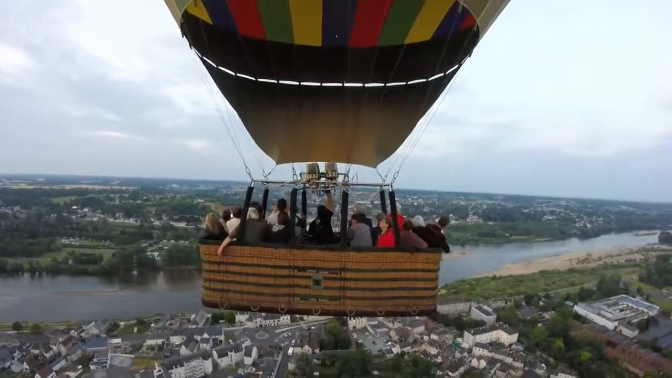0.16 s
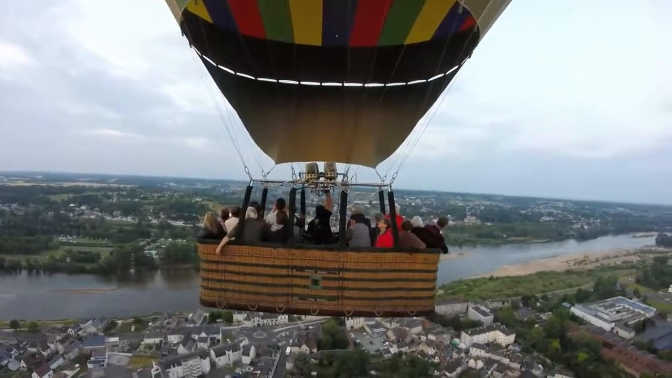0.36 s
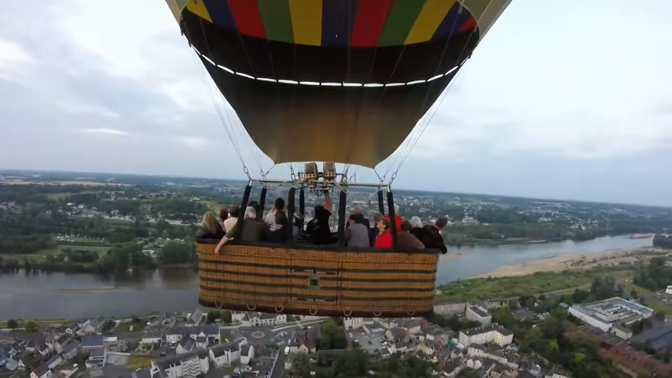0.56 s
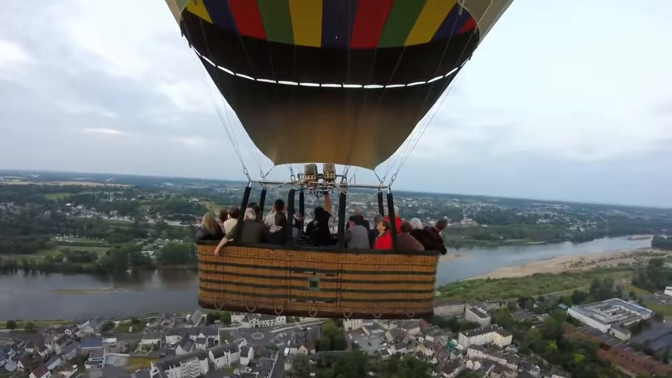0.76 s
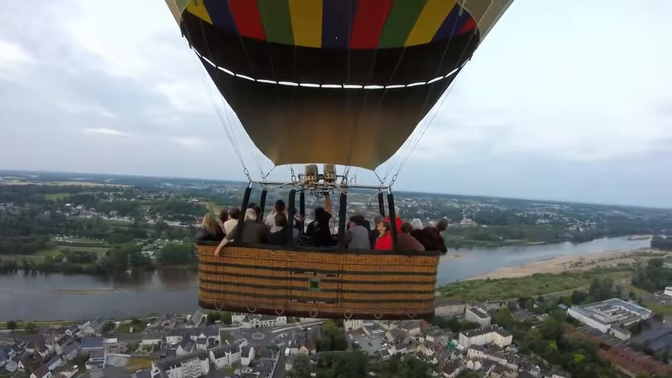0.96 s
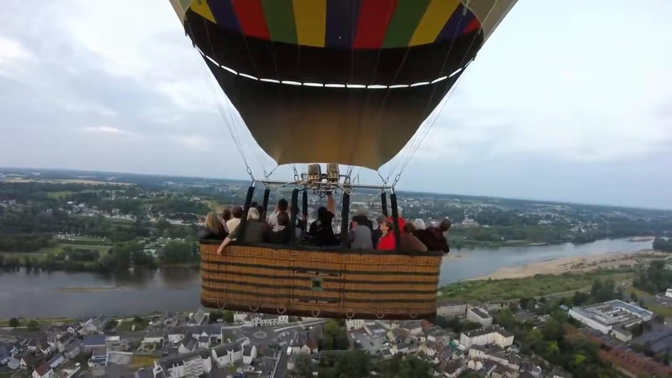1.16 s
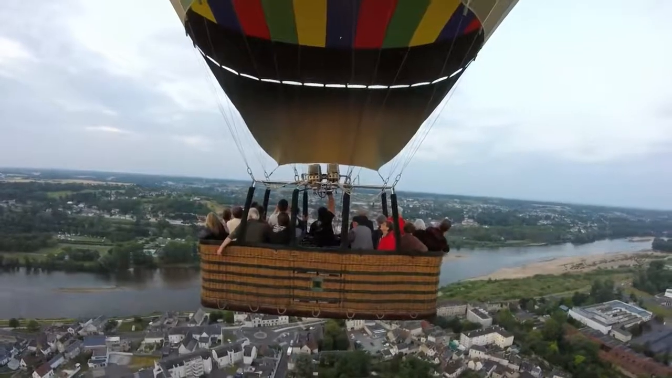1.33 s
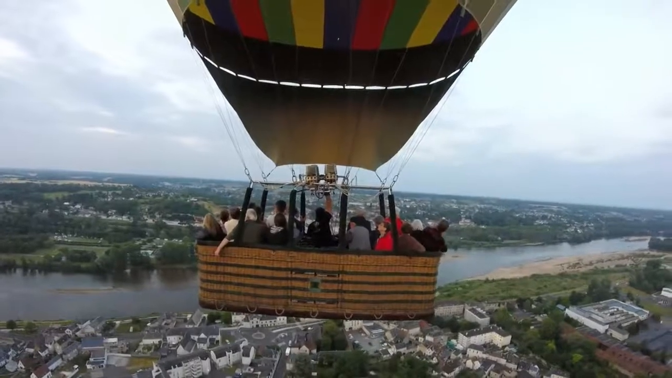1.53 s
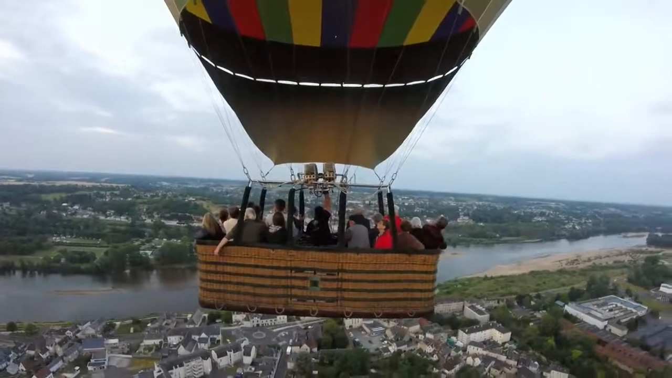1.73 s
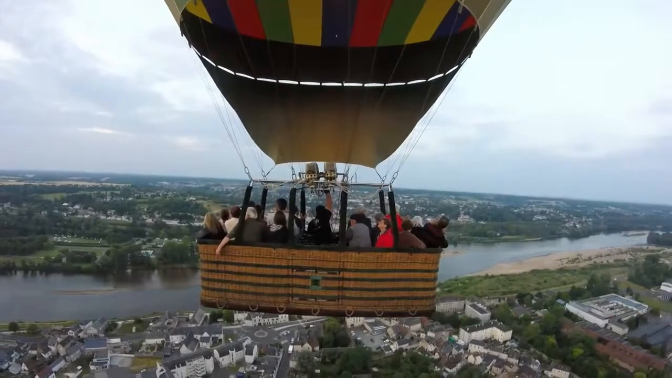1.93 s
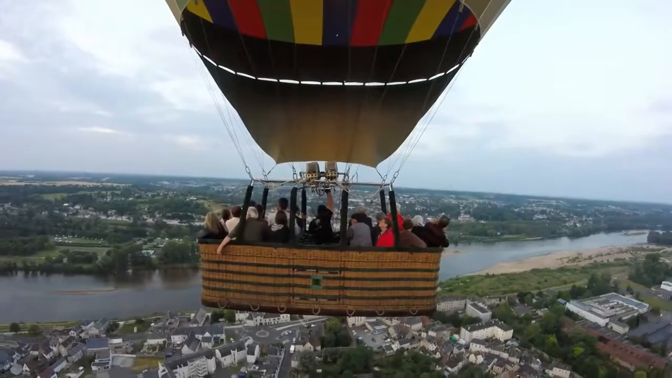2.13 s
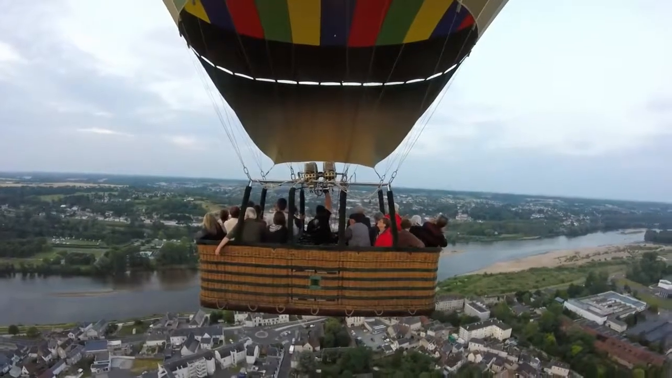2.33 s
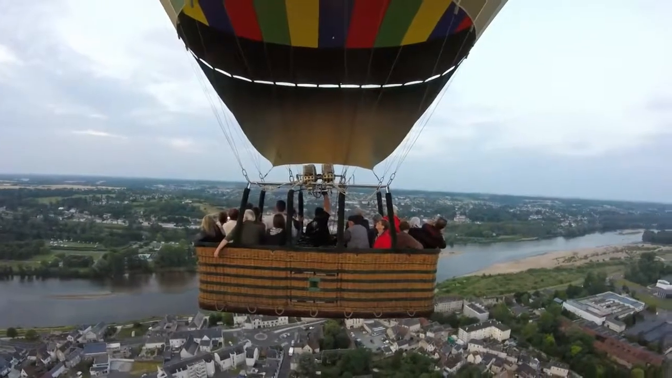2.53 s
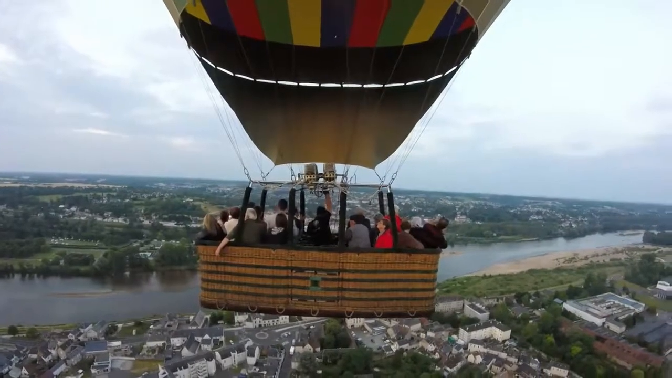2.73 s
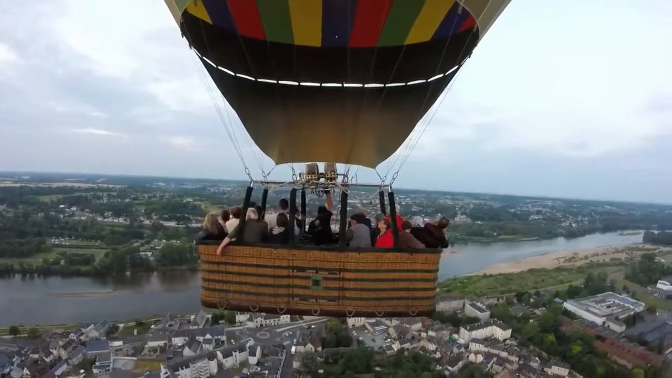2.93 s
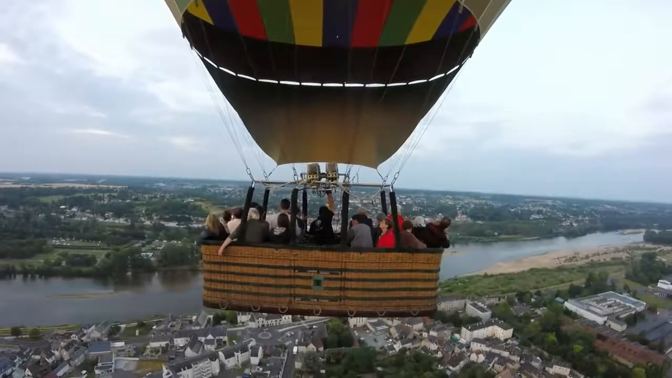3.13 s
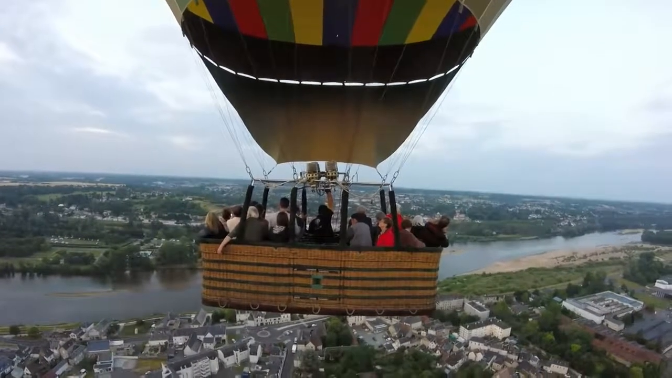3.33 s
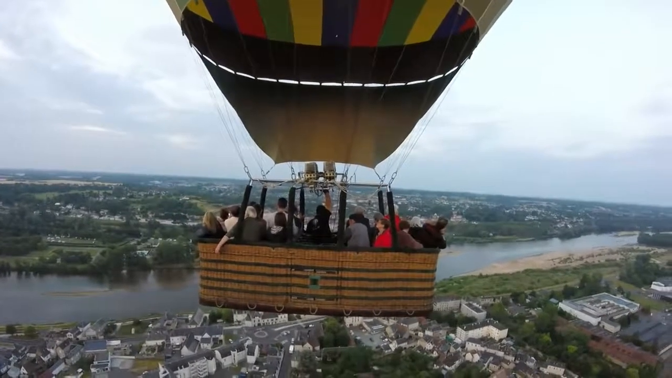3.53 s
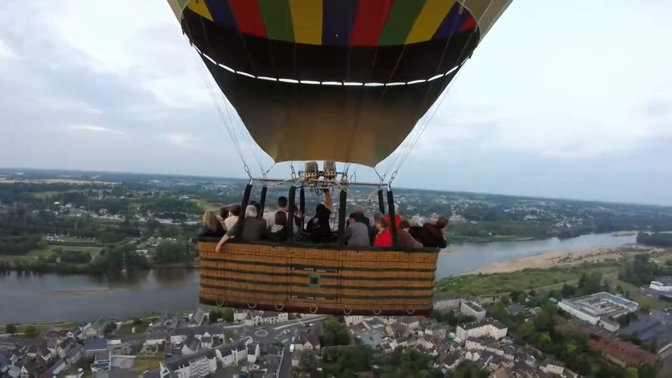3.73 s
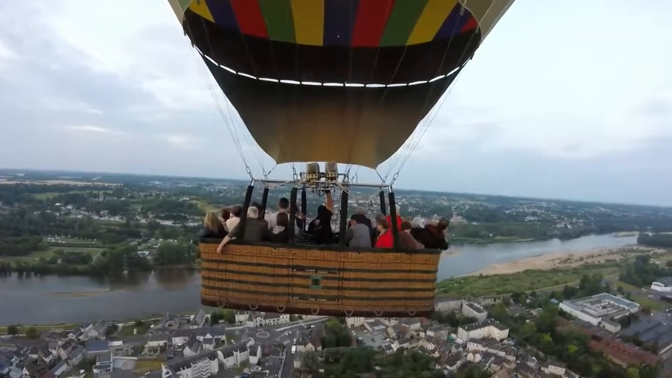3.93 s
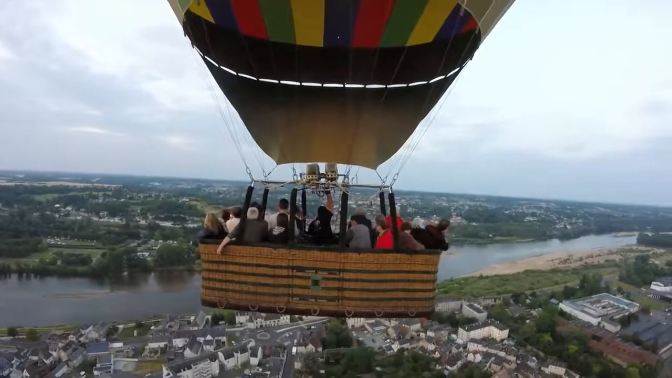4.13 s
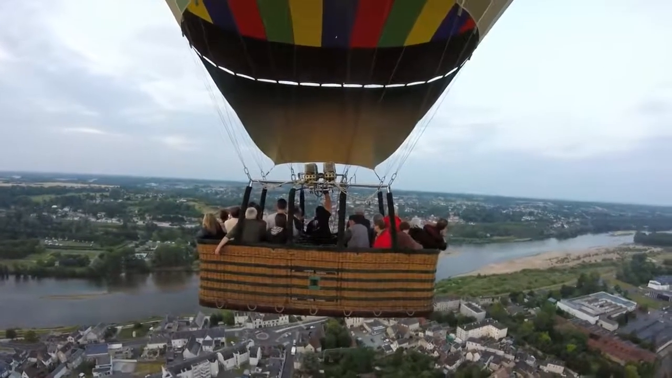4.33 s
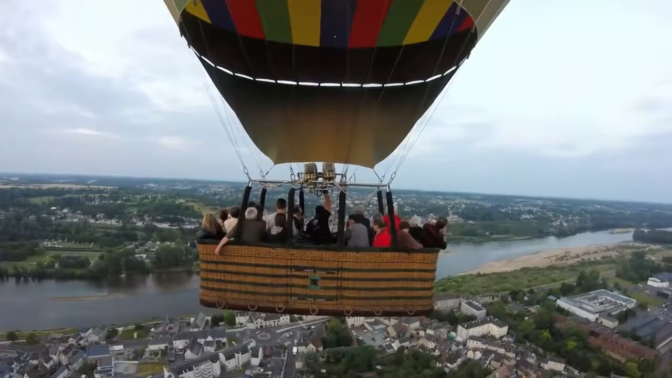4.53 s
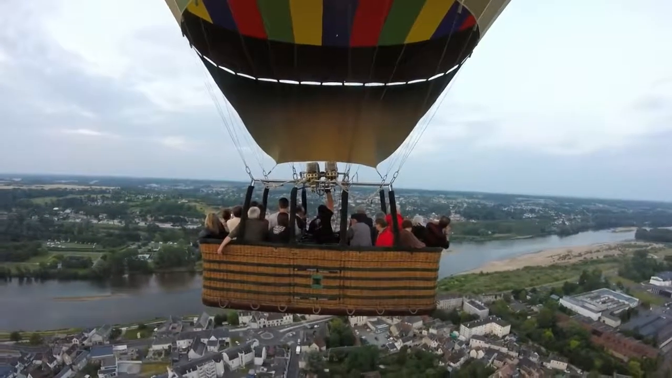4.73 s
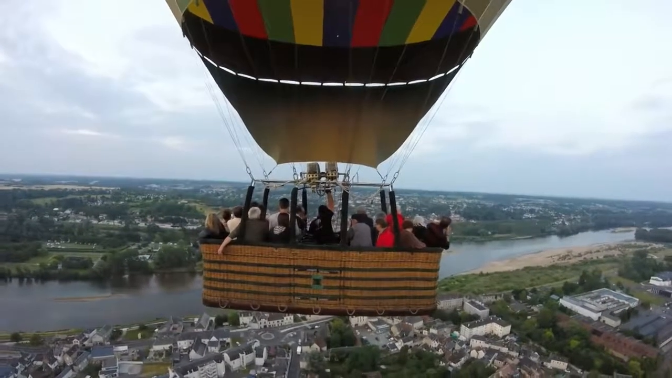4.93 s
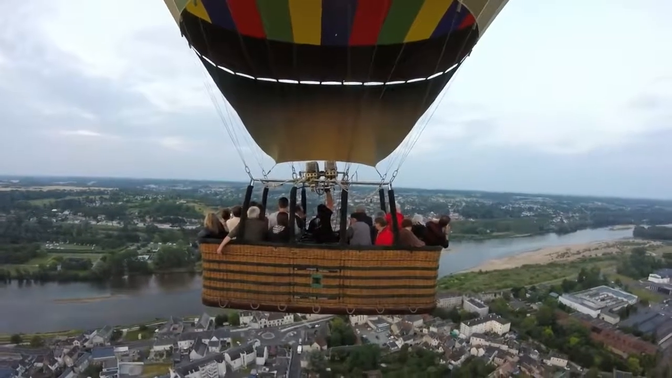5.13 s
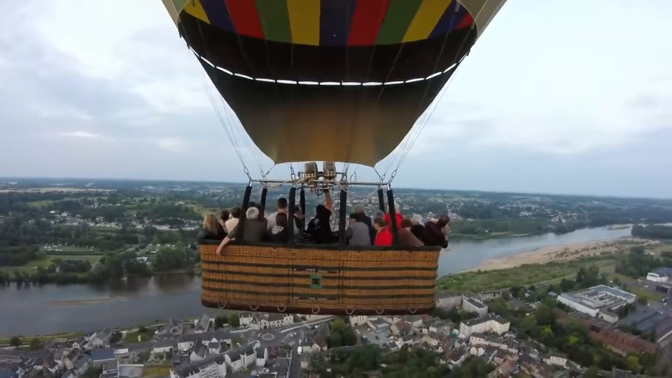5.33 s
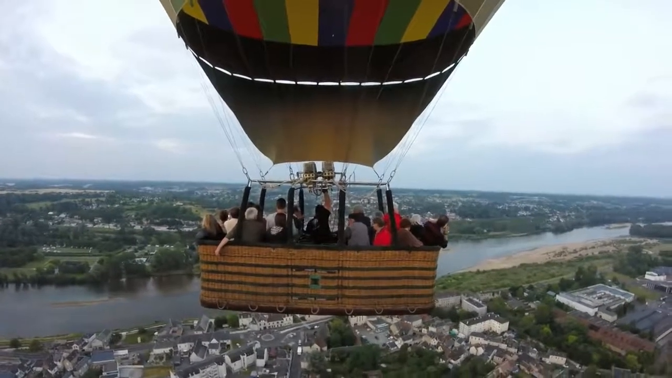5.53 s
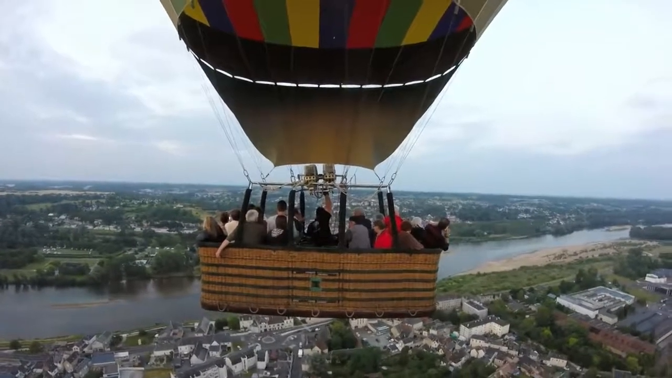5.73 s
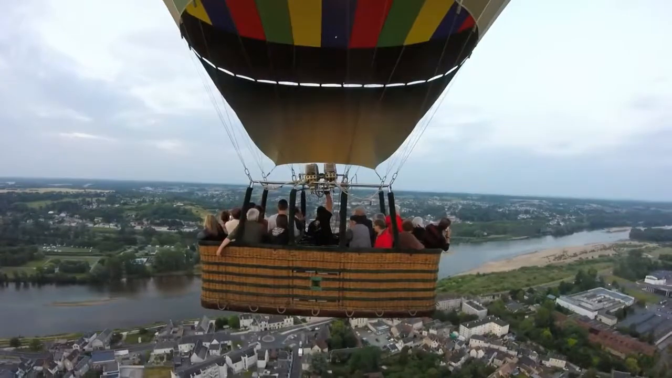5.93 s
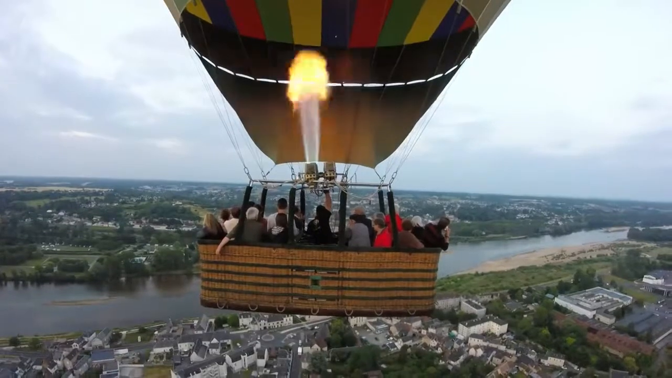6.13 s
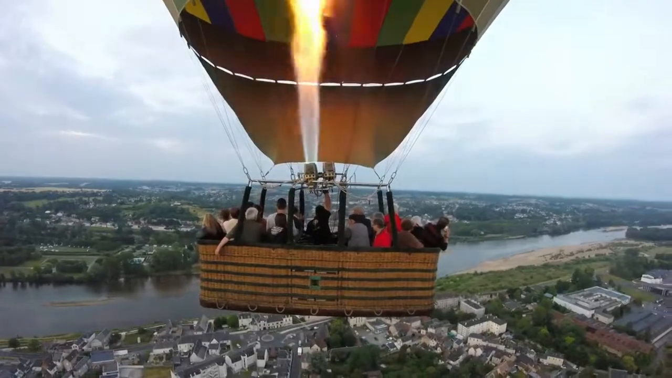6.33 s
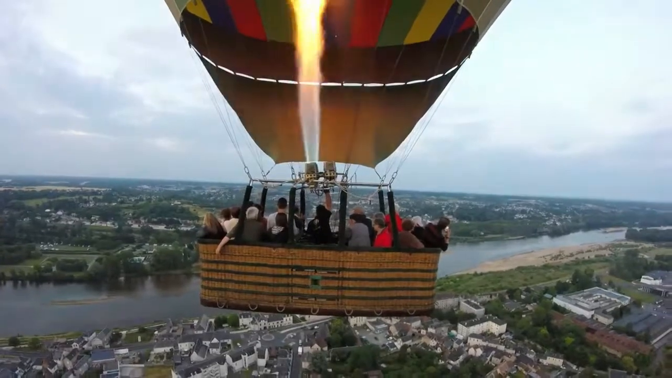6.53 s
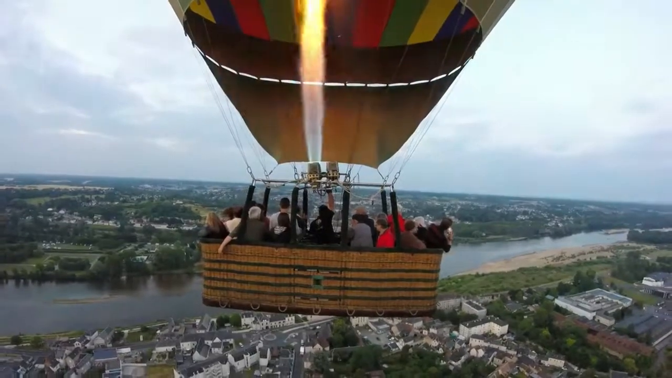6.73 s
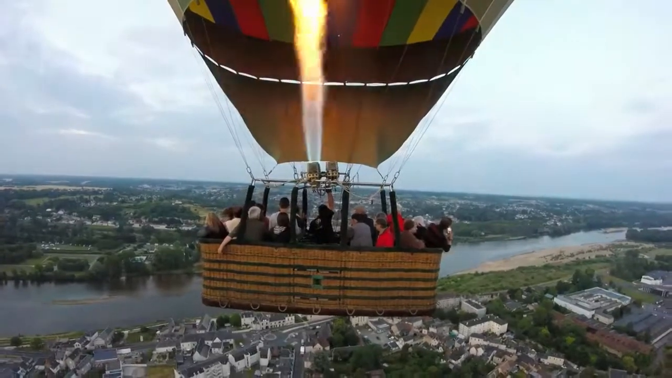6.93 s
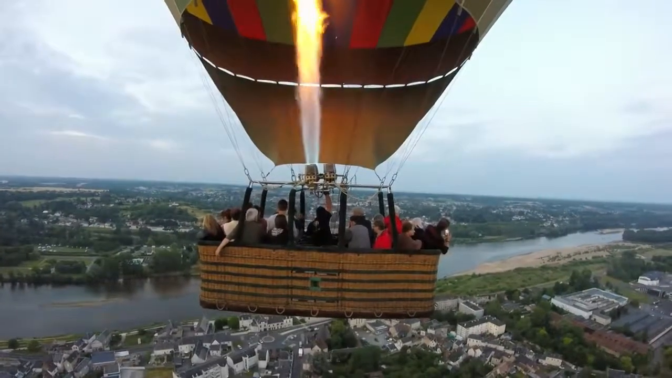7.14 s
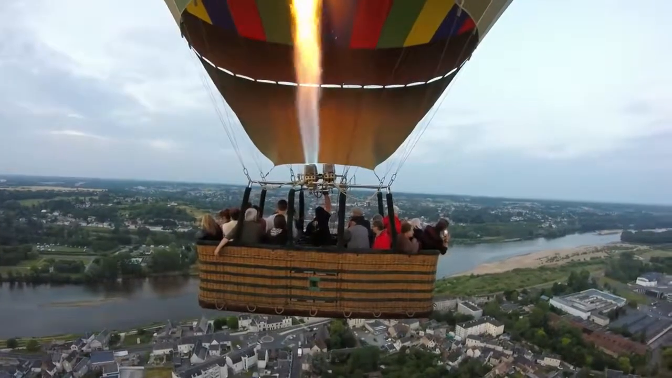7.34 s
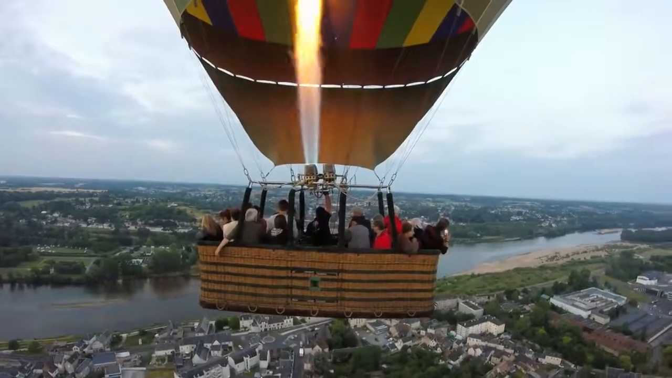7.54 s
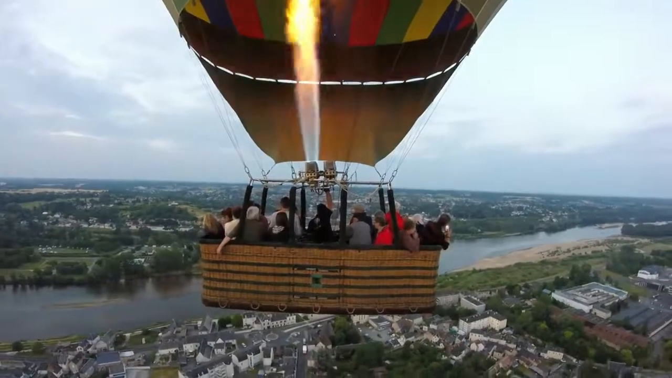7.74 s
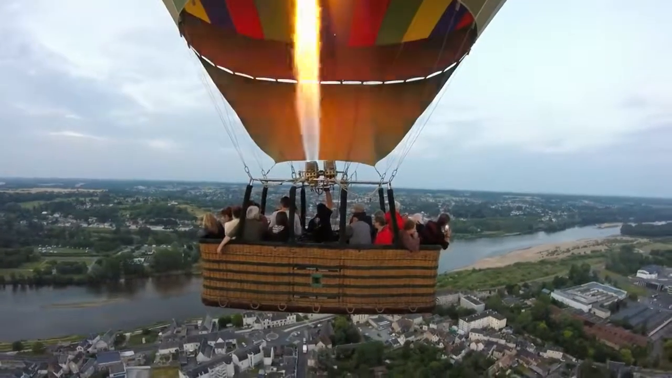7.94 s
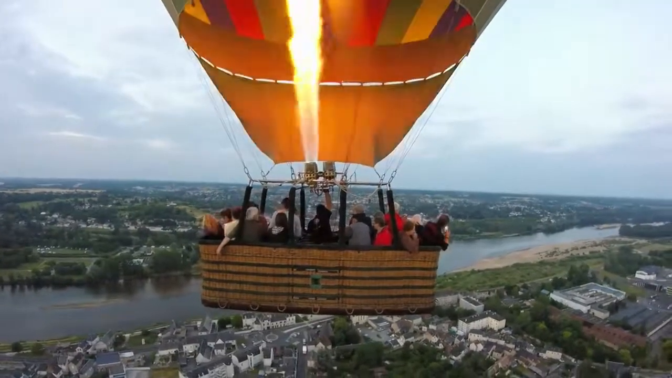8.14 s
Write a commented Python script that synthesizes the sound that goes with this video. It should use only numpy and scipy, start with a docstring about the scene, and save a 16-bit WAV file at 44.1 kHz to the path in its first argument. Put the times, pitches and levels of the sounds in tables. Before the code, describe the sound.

A hot air balloon burner suddenly ignites with a loud, hissing roar after quiet traffic rumble and birdsong far below.

```python
"""High over a town, in a hot air balloon. Traffic murmurs, birds chirp and hoot far below, the rigging ticks.
The propane burner lights with a thump and keeps firing: turbulent flame roar under a bright hiss.
Heard from one point, some metres from the basket."""
import sys
import numpy as np
from scipy import signal
from scipy.fft import rfft, irfft, next_fast_len
from scipy.io import wavfile
from scipy.ndimage import map_coordinates

SR = 44100
rng = np.random.default_rng(int(sys.argv[2]) if len(sys.argv) > 2 else 0)


def generate_wav(sig):
    """Save sig (samples, or channels by samples) to the path in sys.argv[1] as 16-bit PCM at SR."""
    pcm = np.round(np.clip(np.atleast_2d(sig).T, -1, 1) * 32767).astype(np.int16)
    wavfile.write(sys.argv[1], SR, pcm)


N = 360297

VALVE_OPEN_S, IGNITION_S = 6.027, 6.046
# Flame roar spectrum: freq_hz, density_db
ROAR_SPECTRUM = [(20, -26), (40, -1), (90, -0.5), (190, 1), (370, 1), (530, -3), (700, -6.5), (850, -14),
                 (1200, -23), (3000, -49.5)]
# Spectrum of burning gas pockets: freq_hz, density_db
TEARING_SPECTRUM = [(400, -38), (900, -0.5), (1250, -2), (1600, -3.5), (2000, -3.5), (2350, -7.5),
                    (2650, -14.5), (2850, -12.5), (3100, -30.5), (4000, -25.5), (8000, -41)]


def amp(db):
    """Decibels to gain."""
    return 10 ** (np.asarray(db) / 20)


def clock():
    """Sample times in s."""
    return np.arange(N) / SR


def hump(centre_s, width_s):
    """Gaussian, peak 1."""
    return np.exp(-((clock() - centre_s) / width_s) ** 2)


def wobble(knots_per_s):
    """Smooth random curve."""
    knots = rng.standard_normal(int(N * knots_per_s / SR) + 4)
    coarse = np.arange(0, N + 16, 16)
    return np.interp(np.arange(N), coarse, map_coordinates(knots, [coarse * knots_per_s / SR]))


def filtered(x, response):
    """x through a gain given as a function of Hz."""
    size = next_fast_len(N + SR // 2)
    return irfft(rfft(x, size) * response(np.fft.rfftfreq(size, 1 / SR)), size)[:N]


def coloured(x, spectrum):
    """x shaped by (freq_hz, density_db) points, DC blocked, rms 1."""
    freq_hz, density_db = np.transpose(spectrum)
    gain = lambda hz: amp(np.interp(np.log(hz + 1), np.log(freq_hz), density_db))
    shaped = filtered(x, lambda hz: gain(hz) * hz / np.hypot(hz, 10))
    return shaped / np.sqrt(np.mean(shaped ** 2) + 1e-20)


def noise(spectrum):
    """Coloured noise, rms 1."""
    return coloured(rng.standard_normal(N), spectrum)


def traffic(fade_db_per_s=0.25):
    """Far traffic merges into rumble and hiss; tyre noise fades as the balloon drifts."""
    # Low rumble, tyre noise, faint high hiss: freq_hz, density_db
    rumble_spectrum = [(20, -11), (50, 1), (130, -1.5), (260, -3.5), (400, -6), (520, -7), (700, -10.5),
                       (1000, -23), (2500, -55), (8000, -90)]
    tyre_spectrum = [(300, -22), (750, 0), (1100, -2), (1500, -5), (2000, -5.5), (2600, -13), (3600, -13.5),
                     (4600, -21), (6500, -38), (12000, -80)]
    hiss_spectrum = [(2500, -10), (4600, 3), (5700, 1), (6600, -1.5), (7200, 0), (7800, -2), (9100, -2),
                     (9400, -5), (10000, -5.5), (10300, -10.5), (13000, -14), (15500, -20)]
    drift_db = fade_db_per_s * (clock().mean() - clock())
    rumble = amp(-45 + 0.24 * wobble(11)) * noise(rumble_spectrum)
    tyres = amp(-55.5 + drift_db + 0.31 * wobble(8.8)) * noise(tyre_spectrum)
    hiss = amp(-68.5 + 0.34 * wobble(8.6)) * noise(hiss_spectrum)
    return rumble + tyres + hiss


def engines(pitch_drop=0.055):
    """Passing engines swell and sink in pitch; shifting sound paths make them waver."""
    # Far engine notes: start_s, end_s, start_pitch_hz, level_db
    passes = [(0, 4.8, 462, -55), (4.45, 6.25, 265, -49), (0, .55, 84, -50), (3.5, 4.2, 590, -54.5),
              (5.15, 6.1, 402, -51.5)]
    notes = np.zeros(N)
    for start_s, end_s, start_pitch_hz, level_db in passes:
        paths = 0.7 + 0.45 * (wobble(9) + 1j * wobble(9))
        progress = np.clip((clock() - start_s) / (end_s - start_s), 0, 1)
        pitch_hz = start_pitch_hz * (1 - pitch_drop * progress)
        swell = np.sqrt(np.abs(np.sin(np.pi * progress)))
        tone = np.exp(2j * np.pi * np.cumsum(pitch_hz) / SR)
        notes += amp(level_db) * swell * np.real(paths * tone)
    return notes


def bird_calls(rows, length_s, quaver_depth=0.032):
    """One quavering sine glide per row."""
    calls = np.zeros(N + SR)
    quaver = 1 + quaver_depth * wobble(330)
    progress = np.linspace(0, 1, int(length_s * SR))
    envelope = np.sin(np.pi * progress)
    for centre_s, mid_pitch_hz, glide_oct, level_db in rows:
        span = max(int((centre_s - length_s / 2) * SR), 0) + np.arange(len(progress))
        pitch_hz = mid_pitch_hz * 2 ** (glide_oct * (progress - 0.5)) * quaver[span % N]
        calls[span] += amp(level_db) * envelope * np.sin(2 * np.pi * np.cumsum(pitch_hz) / SR)
    return calls[:N]


def flock(count=260):
    """Random chatter of farther birds, higher calls fainter."""
    when, height, glide, strength = rng.random((count, 4)).T
    pitch_hz = np.interp(height, [0, 1], [3050, 4650])
    glide_oct = np.interp(glide, [0, 1], [-0.4, 0.15])
    level_db = -72.5 + 7 * strength - 3 * height
    return bird_calls(zip(when * N / SR, pitch_hz, glide_oct, level_db), length_s=0.045)


def birds(t60_s=0.3):
    """Chirps and soft hoots, blurred by echoes among the roofs."""
    # Nearer birds: centre_s, mid_pitch_hz, glide_oct, level_db
    chirps = [(.135, 3930, -.4, -60), (.19, 3370, -.12, -64), (.39, 4620, -.1, -66), (.82, 4450, -.15, -64),
              (1.09, 3720, -.1, -60), (1.245, 4200, -.5, -59), (1.3, 3400, -.2, -61), (1.59, 4600, .2, -65),
              (2.05, 3480, -.1, -62), (2.14, 4980, -.1, -67), (2.45, 3000, .15, -61.5),
              (2.465, 4450, -.2, -63), (2.61, 3850, .3, -61.5), (2.86, 3400, -.2, -61),
              (3.21, 3700, -.3, -60.5), (3.335, 4700, .1, -63.5), (3.395, 3800, -.4, -59),
              (3.665, 4370, -.15, -63), (3.89, 3380, .1, -60), (4.06, 3570, .15, -60),
              (4.46, 5040, -.1, -66.5), (4.745, 4500, -.2, -61.5), (4.8, 3560, .1, -64),
              (5.34, 3420, .12, -61), (5.785, 3950, .2, -62)]
    # Low-voiced bird: centre_s, pitch_hz, level_db
    hoots = [(.63, 493, -48), (2.69, 496, -47), (3.53, 507.6, -43)]
    flat_hoots = [(centre_s, pitch_hz, 0, level_db) for centre_s, pitch_hz, level_db in hoots]
    calls = bird_calls(chirps, length_s=0.065) + flock()
    calls += bird_calls(flat_hoots, length_s=0.1, quaver_depth=0.03)
    tail = rng.standard_normal(SR // 2) * amp(-60 * clock()[:SR // 2] / t60_s)
    echoes = signal.fftconvolve(calls, tail / np.linalg.norm(tail))[:N]
    return amp(-1) * calls + amp(-2) * echoes


def rigging(t60_s=0.1):
    """Faint dry ticks of the fittings."""
    # Ticks: start_s, level_db
    ticks = [(.168, -63), (2.085, -64), (2.16, -68), (4.43, -60)]
    # Tick spectrum: freq_hz, density_db
    tick_spectrum = [(3000, -25), (6000, -6), (7500, 3), (9800, -3), (12000, -18), (15000, -25)]
    envelope = np.zeros(N)
    for start_s, level_db in ticks:
        age_s = np.maximum(clock() - start_s, 0)
        envelope += amp(level_db - 60 * age_s / t60_s) * (clock() >= start_s)
    return envelope * noise(tick_spectrum)


def gas_feed(rise_s, peak_s, width_s, overshoot_db, sag_db_per_s=0.42):
    """Gain after the valve opens: smooth rise, overshoot, slow sag as feed pressure eases."""
    age_s = np.maximum(clock() - VALVE_OPEN_S, 0)
    onset = 1 - np.exp(-(age_s / rise_s) ** 2)
    return onset * amp(overshoot_db * hump(VALVE_OPEN_S + peak_s, width_s) - sag_db_per_s * age_s)


def gas_pockets(per_s):
    """Pockets of gas burn as impulses of random time and size."""
    return rng.standard_normal(N) * (rng.random(N) < per_s / SR)


def cavity_ring(flame):
    """The balloon's mouth and the burner can add narrow resonances."""
    # Resonances: centre_hz, width_hz, gain_db
    modes = [(92, 12, -5), (176, 14, -5), (1143, 9, -1)]
    return filtered(flame, lambda hz: 1 + sum(
        amp(gain_db) * 1j * hz * width_hz / (centre_hz ** 2 - hz ** 2 + 1j * hz * width_hz)
        for centre_hz, width_hz, gain_db in modes))


def burner(roar_db=-14.6, tearing_db=-31.5, hiss_db=-37, flare_share=0.48):
    """Gas rushes out with a bright hiss; the flame roars, flutters and flares."""
    # Flare-ups: centre_s, boost_db
    flares = [(6.535, 2.5), (6.93, 3.2), (7.35, 0.5), (7.88, 1), (8.01, 1)]
    flare_db = sum(boost_db * hump(centre_s, width_s=0.039) for centre_s, boost_db in flares)
    flutter = wobble(45)  # large eddies swell the whole flame at once
    roar = amp(roar_db + flare_db + 0.91 * flutter) * noise(ROAR_SPECTRUM)
    roar *= gas_feed(rise_s=0.041, peak_s=0.33, width_s=0.095, overshoot_db=3.3)
    tearing = coloured(gas_pockets(per_s=10000), TEARING_SPECTRUM)
    tearing *= amp(tearing_db + flare_share * flare_db + 0.52 * flutter)
    tearing *= gas_feed(rise_s=0.036, peak_s=0.32, width_s=0.13, overshoot_db=4.1)
    # Bright hiss while firing; its narrow 4.1 kHz dip is not from the jets: freq_hz, density_db
    bright_spectrum = [(2500, -14), (3400, -7), (4100, -16.5), (4900, -5.5), (5500, -4.5), (6700, -7.5),
                       (7200, -1), (8450, 2.5), (9100, -7), (9900, -5), (10500, -9.5), (13300, -13.5),
                       (13900, -10), (15700, -28)]
    hiss = amp(hiss_db + flare_share * flare_db + 0.98 * wobble(32)) * noise(bright_spectrum)
    hiss *= gas_feed(rise_s=0.038, peak_s=0.27, width_s=0.14, overshoot_db=3.1)
    return cavity_ring(roar + tearing) + hiss


def ignition(swing_hz=205, slowing_s=0.036, push_hz=58, puff_width_s=0.013):
    """The first gas cloud lights: a pressure swing slowing as the fireball grows, a push, a puff."""
    age_s = np.maximum(clock() - IGNITION_S, 0)
    envelope = (1 - np.exp(-age_s / 0.0025)) * np.exp(-(age_s / 0.032) ** 2)
    swing_cycles = swing_hz * slowing_s * np.log1p(age_s / slowing_s)
    swing = amp(-3.5) * np.sin(2 * np.pi * swing_cycles) * np.exp(-age_s / 0.037)
    push = amp(-12) * np.sin(2 * np.pi * push_hz * age_s)
    puff = amp(-15) * noise(ROAR_SPECTRUM) + amp(-30) * noise(TEARING_SPECTRUM)
    return envelope * (swing + push) + hump(IGNITION_S + puff_width_s / 2, puff_width_s) * puff


def scene():
    """All sources summed, same in both channels."""
    mono = burner() + ignition() + traffic() + engines() + birds() + rigging()
    return np.array([mono, mono])


def record(dry):
    """Soft peak limiter, then a steep low-pass."""
    cutoff_hz, transition_hz = 15720, 200
    limited = dry / (1 + np.abs(dry) ** 8) ** (1 / 8)
    low_pass = lambda hz: np.clip((cutoff_hz - hz) / transition_hz + 0.5, 0, 1)
    return np.array([filtered(channel, low_pass) for channel in limited])


dry = scene()
out = record(dry)
generate_wav(out)
```